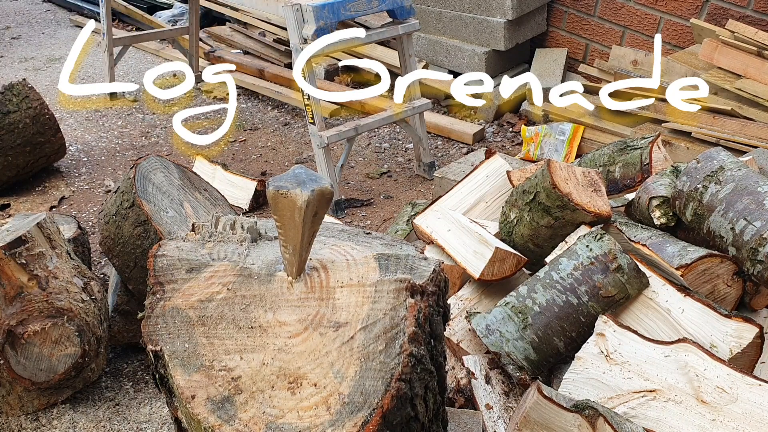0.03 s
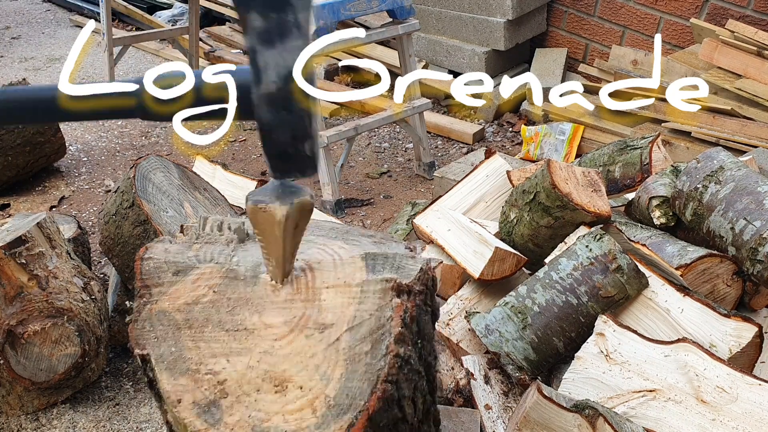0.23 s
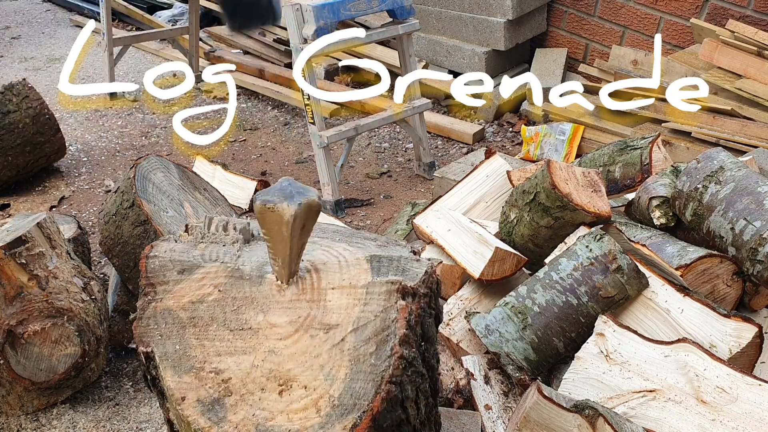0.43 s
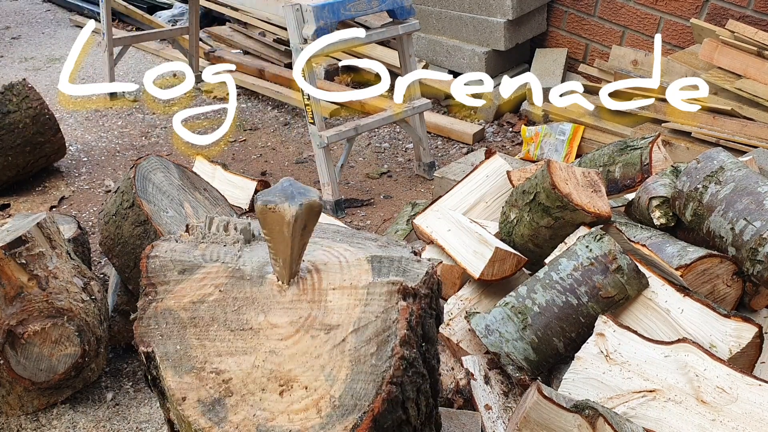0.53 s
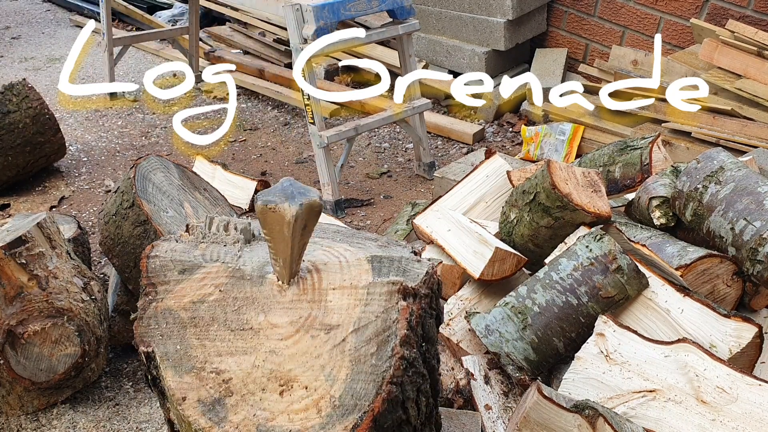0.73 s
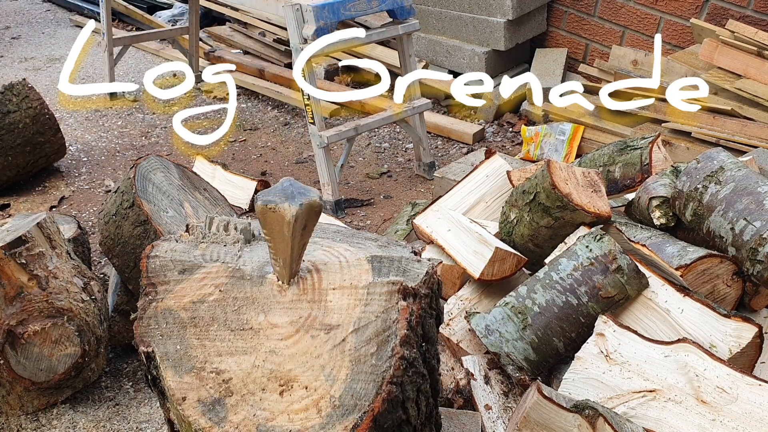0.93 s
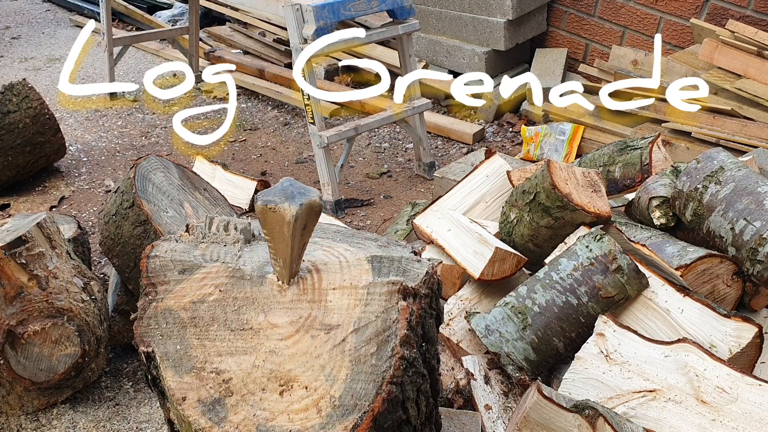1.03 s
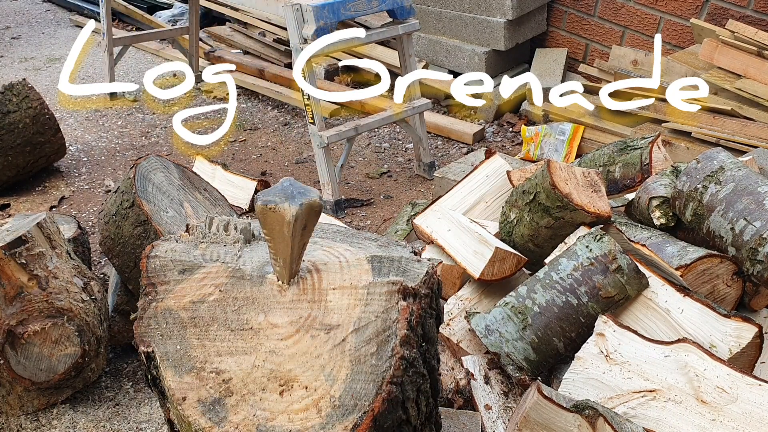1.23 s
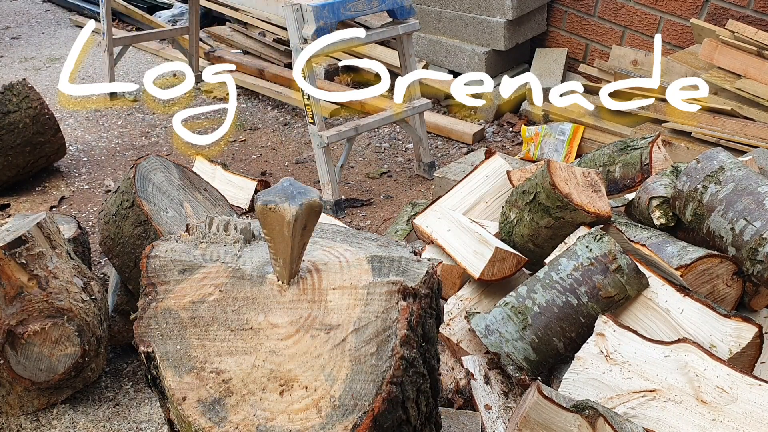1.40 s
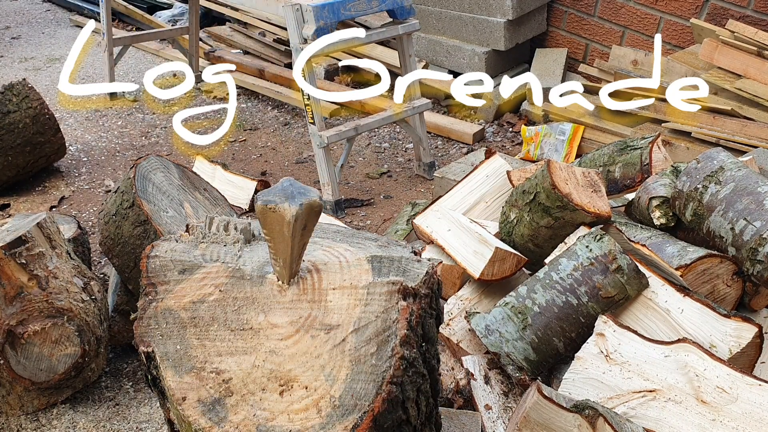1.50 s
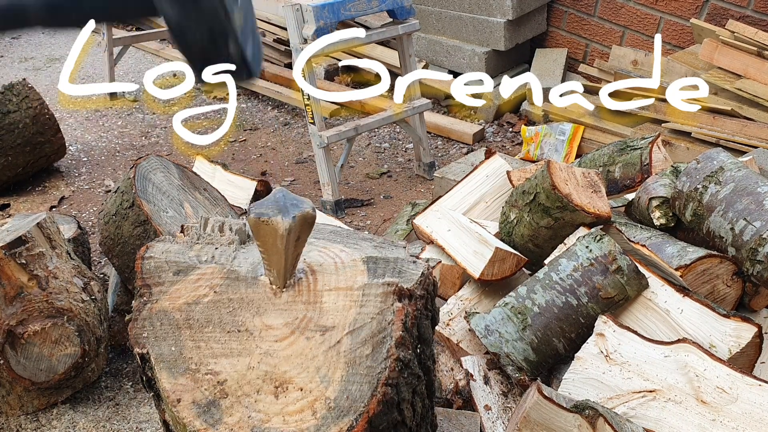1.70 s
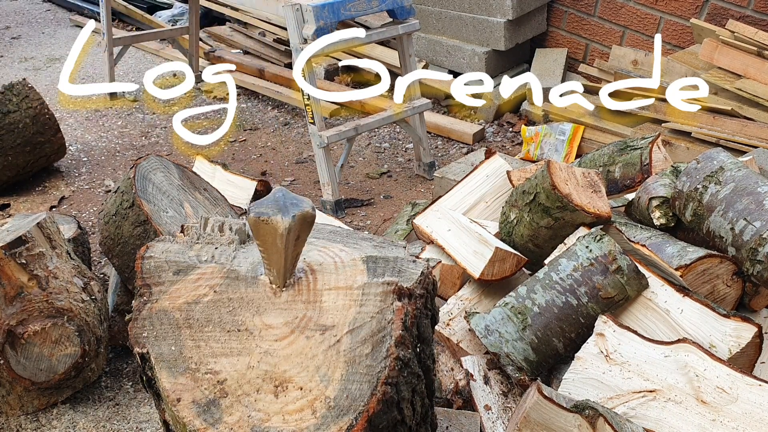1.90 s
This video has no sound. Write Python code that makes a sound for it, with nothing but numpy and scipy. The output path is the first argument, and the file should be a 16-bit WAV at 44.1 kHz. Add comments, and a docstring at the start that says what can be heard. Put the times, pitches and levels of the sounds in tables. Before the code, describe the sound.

Two sharp hammer blows on a steel splitting wedge, with a high metallic ring, outdoors.

```python
"""A steel wedge standing in a log is struck twice by a sledgehammer, close by in a wood yard.
Each impact radiates a broadband crack and excites the normal modes of wedge, hammer head and log.
The gripped wedge is soon damped, the free head sings on, and the log knocks and rocks on the ground.
Woodpiles scatter the sound and far walls reflect it over a faint outdoor rumble."""
import sys
import numpy as np
from scipy import signal
from scipy.fft import rfft, irfft, next_fast_len
from scipy.io import wavfile
from scipy.ndimage import map_coordinates

SR = 44100
rng = np.random.default_rng(int(sys.argv[2]) if len(sys.argv) > 2 else 0)


def store_wav(level_fs):
    """Save 16-bit WAV to argv[1]."""
    pcm = np.round(np.clip(np.atleast_2d(level_fs), -1, 1) * 32767)
    wavfile.write(sys.argv[1], SR, pcm.T.astype(np.int16))


N = 85995

# spectra of the crack, its scatter and the lingering high ring of the steel (f/Hz, level/dB)
CRACK_SPECTRUM = [(60, -12.5), (200, 5.5), (800, -0.5), (1300, -6), (2400, -3), (4000, -8.5), (5300, -4.5),
                  (7200, -17), (10200, -5), (12300, -17), (14000, -36), (16000, -38.5)]
SCATTER_SPECTRUM = [(50, 8), (200, 7), (500, -2), (1000, -12.5), (2400, -8), (4200, -8), (4900, -7),
                    (5500, 3), (6000, -10), (7200, -24.5), (8500, -15.5), (9400, -18), (10300, -11),
                    (11000, -20), (12200, -14), (13000, -40.5), (16000, -57.5)]
SHEEN_SPECTRUM = [(4000, -60), (5000, -6), (5450, 5), (6000, -14), (7300, -26), (8400, -5), (9300, -9),
                  (10300, 2), (10900, -14), (12100, -3), (12600, -8.5), (13100, -50)]
def contact(t, hold_s=.00094, crack_t60=.031):
    """Impact and scattering: a brief steel contact is broadband; the woodpiles spread it in time."""
    overshoot = np.exp(np.log(1000) * hold_s / crack_t60)
    held_decay = np.minimum(overshoot * fade(t, crack_t60), 1)
    crack = unit(noise(CRACK_SPECTRUM, NEAR_COHERENCE)) * held_decay
    scatter = unit(noise(SCATTER_SPECTRUM, NEAR_COHERENCE)) * fade(t, t60=.15, rise=.0077)
    sheen = unit(noise(SHEEN_SPECTRUM, FAR_COHERENCE)) * fade(t, t60=.59, rise=.02)
    return amp(-14) * crack + amp(-20) * scatter + amp(-52.5) * sheen


# modes of the wedge (f/Hz) and their decays (left level/dB, right level/dB, T60/s)
WEDGE_MODES = [5116, 10260, 11503, 11958]
WEDGE_DECAYS = [(-9.5, -16, 0.17), (-25, -32, 0.046), (-38.5, -33, 0.24), (-38.5, -42.5, 0.19)]
def wedge(t, lag_s=.00009):
    """Damped free vibration: the gripping wood drains the wedge's modes. The right ear lags."""
    ears = np.array([t, np.maximum(t - lag_s, 0)])
    ring = 0
    for hz, (left, right, t60) in zip(WEDGE_MODES, WEDGE_DECAYS):
        tone = np.imag(shimmer() * np.exp(2j * np.pi * hz * ears))
        ring += amp([[left], [right]]) * tone * fade(ears, t60)
    return ring


def shimmer(depth=.15, points_per_s=110):
    """Random modulation: level and phase flutter independently at each ear."""
    position = since(0) * points_per_s
    drift = lambda: map_coordinates(rng.standard_normal(1024), [position], mode="mirror")
    return 1 + depth * np.array([drift() + 1j * drift() for ear in "LR"])


# the hammer's ring in each ear: it swells, holds, then fades (t/s, left level/dB, right level/dB)
HAMMER_ENVELOPE = [(0, -44.5, -34.5), (0.048, -45, -25), (0.132, -31, -35.5), (0.219, -38, -41),
                   (.31, -47.5, -45), (0.411, -74, -67.5), (.56, -84, -85), (.8, -125, -125)]
def hammer(t, note_hz=6295, overtone_hz=9892, lead_s=.000018):
    """Lightly damped vibration: the free head sings one long note and a shorter overtone."""
    times, left, right = np.transpose(HAMMER_ENVELOPE)
    envelope = amp([np.interp(t, times, left), np.interp(t, times, right)])
    ears = np.array([t, t + lead_s])
    note = sine(note_hz, ears) * (1 - np.exp(-t / .00068))
    overtone = amp(-1.5) * sine(overtone_hz, ears) * fade(t, t60=.42, rise=.069)
    return envelope * (note + overtone)


# modes of the log (f/Hz) and their decays (level/dB, T60/s)
LOG_MODES = [150, 240, 318, 430, 503, 790, 867, 1303, 1400, 1610, 2255, 2450]
LOG_DECAYS = [(-34.5, 0.42), (-28.5, .09), (-27, 0.13), (-20, .04), (-28, 0.073), (-20.5, .03),
              (-17, 0.041), (-29.5, 0.086), (-27, 0.061), (-27.5, 0.089), (-25, 0.057), (-32, 0.085)]
def log_ring(t):
    """Modal superposition: the log's short-lived modes add with alternating signs."""
    return sum((-1) ** k * amp(db) * sine(hz, t) * fade(t, t60, rise=.00023)
               for k, (hz, (db, t60)) in enumerate(zip(LOG_MODES, LOG_DECAYS)))


def log_shove(t, hz=235):
    """Heavily damped transient: the wedge drives into the log with one low, dead punch."""
    return -amp(-10.5) * sine(hz, t) * fade(t, t60=.038)


def thud(t, hz=60, peak_s=.041, width_s=.016, delay_s=.0226):
    """Rebound: the log bounces on the ground, radiating a packet of a few deep cycles."""
    swell = np.exp(-.5 * ((t - peak_s) / width_s) ** 2)
    onset = 1 - np.exp(-t / .015)
    return amp(-15) * swell * onset * sine(hz, t - delay_s)


# spectrum of the settling knock (f/Hz, level/dB)
SETTLE_SPECTRUM = [(100, -7), (300, 7), (550, -1), (800, -4), (1100, -13), (4000, -43), (12000, -57)]
def settle(t):
    """Secondary impact: the log comes to rest with a small, dull knock."""
    return amp(-27.5) * unit(noise(SETTLE_SPECTRUM, NEAR_COHERENCE)) * fade(t, t60=.045, rise=.00069)


# spectrum of the swing (f/Hz, level/dB)
SWISH_SPECTRUM = [(60, 19.5), (250, 14.5), (500, 0), (1200, -7.5), (3000, -12), (7000, -13), (8600, 6.5),
                  (12000, -10.5), (16000, -9.5)]
def swish(blow_s, lead_s=.09):
    """Aerodynamic noise: the swing swells faintly just before the blow."""
    return amp(-72.5) * bump(blow_s - lead_s, width=.06) * noise(SWISH_SPECTRUM, NEAR_COHERENCE)


# response of the path by the flat wall (f/Hz, level/dB)
SLAP_RESPONSE = [(200, 0.5), (1000, -26.5), (3500, -14), (5200, 4.5), (7000, -10), (10300, -11),
                 (12000, -19), (15000, -27)]
def slap(x, delay_s=.223):
    """Specular reflection: one flat wall returns a distinct, delayed and coloured copy."""
    path = lambda hz: np.exp(-2j * np.pi * hz * delay_s) * amp(along(SLAP_RESPONSE, hz))
    return amp(-28.5) * filtered(x, path)


# echoes from the far walls (delay/s, level/dB, spread/s)
WALL_ECHOES = [(0.171, -34, 0.0047), (.205, -31.5, 0.035), (0.24, -37.5, 0.011), (.345, -41, 0.054),
               (0.416, -49, 0.06)]
# spectra of the echoes and of the reverberant tail (f/Hz, level/dB)
ECHO_SPECTRUM = [(25, -3), (60, 15), (200, 15), (600, -7), (1500, 0.5), (4000, -3), (5300, -2), (7000, -38),
                 (10300, -35), (12500, -41.5), (14000, -63)]
TAIL_SPECTRUM = [(25, 14.5), (60, 31.5), (110, 17.5), (260, 11), (500, -7), (1200, -7.5), (3000, -8),
                 (5300, -16.5), (7000, -30.5), (10300, -26.5), (14000, -48.5)]
def yard(x):
    """Diffuse reflection: convolution with smeared wall echoes over a dull, decaying tail."""
    echo_envelope = sum(amp(db) * unit(bump(delay, spread)) for delay, db, spread in WALL_ECHOES)
    tail_envelope = amp(-20) * unit(fade(since(0), t60=.99, rise=.03))
    echoes = echo_envelope * noise(ECHO_SPECTRUM, FAR_COHERENCE)
    tail = tail_envelope * noise(TAIL_SPECTRUM, FAR_COHERENCE)
    impulse_response = (echoes + tail) / np.sqrt(N)
    return signal.fftconvolve(x[None], impulse_response, axes=1)[:, :N]


# outdoor background: spectrum (f/Hz, level/dB) and left-right likeness (f/Hz, coherence)
AIR_SPECTRUM = [(12, -33), (20, -6.5), (74, -1.5), (120, -18), (310, -28), (485, -40), (1190, -38),
                (1810, -46), (2460, -47), (3740, -46.5), (6540, -57), (8650, -43.5), (16000, -56.5)]
AIR_COHERENCE = [(60, 0.95), (300, 1), (1000, .2), (10000, 0)]
def air():
    """Stationary noise: a faint, steady outdoor rumble."""
    return amp(-61.5) * unit(noise(AIR_SPECTRUM, AIR_COHERENCE))


# left-right likeness of near and of far sound (f/Hz, coherence)
NEAR_COHERENCE = [(100, 1), (300, .95), (700, 1), (1500, -0.1), (3000, .15), (7000, -0.74), (15000, 0.16)]
FAR_COHERENCE = [(60, 0.9), (290, .88), (640, .25), (1400, 0.26), (3000, 0), (15000, 0)]
def noise(spectrum, coherence):
    """Partial coherence: the balance of independent mid and side noise sets how alike the ears are."""
    def response(hz):
        angle = np.arccos(np.clip(along(coherence, hz), -1, 1)) / 2
        return amp(along(spectrum, hz)) * [np.cos(angle), np.sin(angle)]
    mid, side = filtered(rng.standard_normal((2, N)), response)
    return np.array([mid + side, mid - side])


def amp(db):
    """Amplitude ratio of a level in decibels."""
    return 10 ** (np.asarray(db) / 20)


def unit(x):
    """Normalisation to rms 1."""
    return x / np.sqrt(np.mean(x ** 2) + 1e-20)


def along(points, hz):
    """Interpolation of (f/Hz, value) points on a logarithmic frequency axis."""
    f, values = np.transpose(points)
    return np.interp(np.log(hz + 1), np.log(f + 1), values)


def filtered(x, response):
    """Linear filtering: the spectrum of x times a frequency response."""
    size = next_fast_len(N + SR // 2)
    return irfft(rfft(x, size) * response(np.fft.rfftfreq(size, 1 / SR)), size)[..., :N]


def since(s):
    """Seconds elapsed since time s, zero before it."""
    return np.maximum(np.arange(N) / SR - s, 0)


def fade(t, t60, rise=.000067):
    """Exponential decay of 60 dB in t60 seconds, after an onset with time constant rise."""
    return (1 - np.exp(-t / rise)) * np.exp(-np.log(1000) * t / t60)


def bump(s, width):
    """Gaussian envelope centred on time s."""
    return np.exp(-.5 * ((since(0) - s) / width) ** 2)


def sine(hz, t):
    """Simple harmonic motion."""
    return np.sin(2 * np.pi * hz * t)


# instants of the blows (t/s)
BLOW_TIMES = [.2453, 1.5396]
# gains of each blow (level/dB of: crack, log ring, shove, wedge, hammer, thud)
BLOW_LEVELS = [(4, 3, -3.5, 4.5, 0, 0), (2, -3, -3.5, 2, -3.5, -2.5)]
def scene():
    """Superposition: both blows, their reflections, the log settling after the first, and the air."""
    out = air() + settle(since(.3025))
    for s, (crack_db, log_db, shove_db, wedge_db, hammer_db, thud_db) in zip(BLOW_TIMES, BLOW_LEVELS):
        t = since(s)
        clang = amp(wedge_db) * wedge(t)
        note = amp(hammer_db) * hammer(t)
        steel = amp(crack_db) * contact(t) + clang
        wood = amp(log_db) * log_ring(t) + amp(shove_db) * log_shove(t) + amp(thud_db) * thud(t)
        impulse = np.arange(N) == round(s * SR)
        to_walls = amp(crack_db + 13) * impulse + amp(-6.5) * clang[0] + amp(9) * note[1]
        out = out + swish(s) + steel + note + wood + slap(steel) + yard(to_walls)
    return out


def record(dry, ceiling=1.7, top_hz=16200):
    """Soft saturation and band limiting: the highest peaks are rounded, the top treble is cut."""
    rounded = dry / (1 + (dry / ceiling) ** 4) ** (1 / 4)
    return filtered(rounded, lambda hz: np.clip((top_hz - hz) / 400 + .5, 0, 1))


dry = scene()
out = record(dry)
store_wav(out)
```